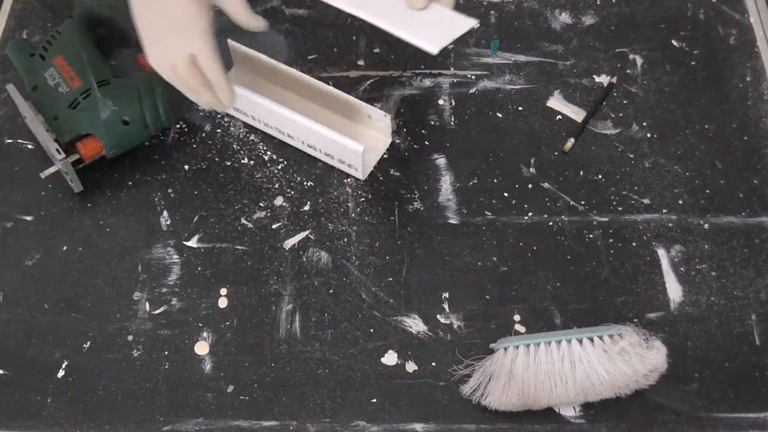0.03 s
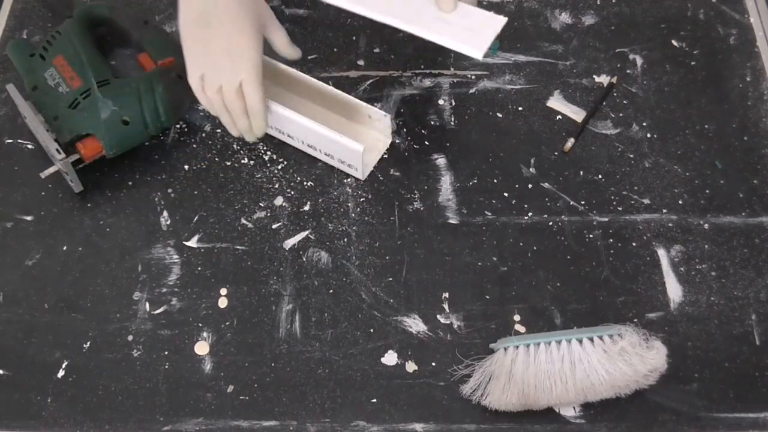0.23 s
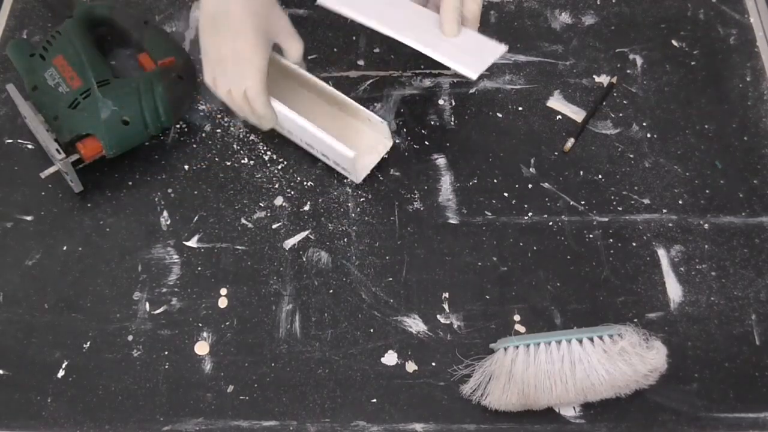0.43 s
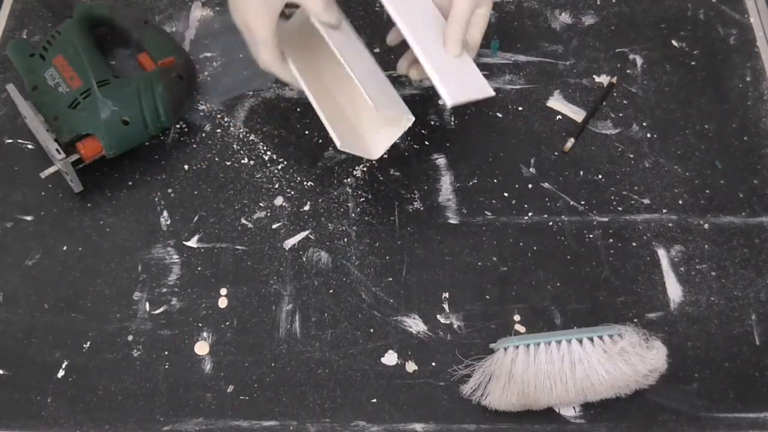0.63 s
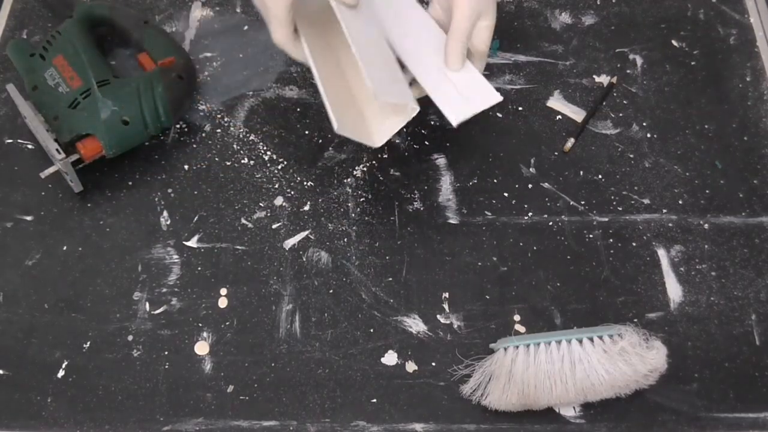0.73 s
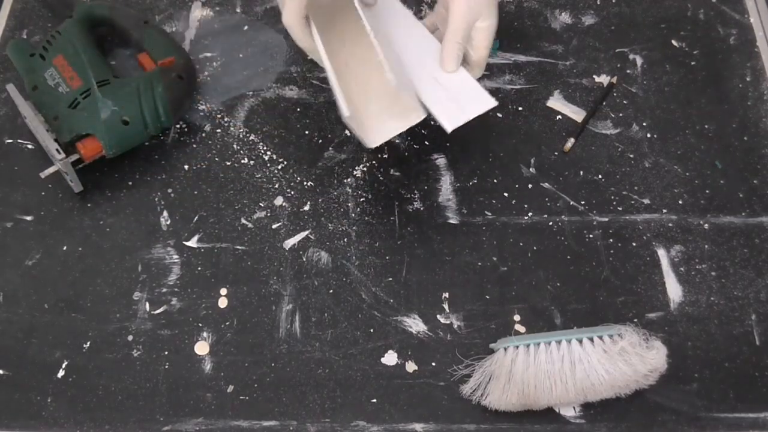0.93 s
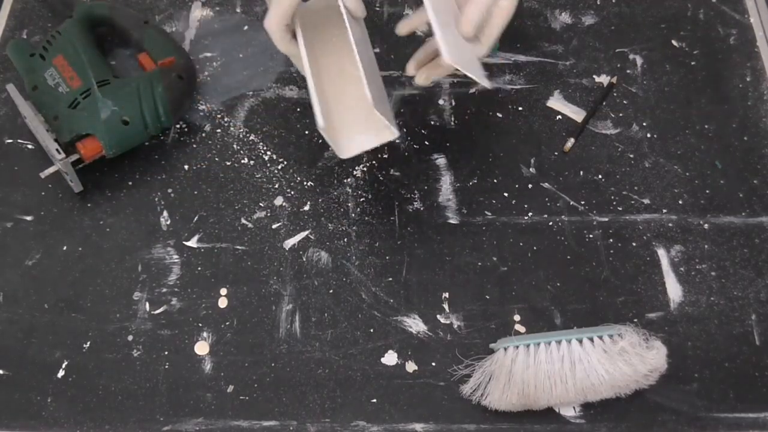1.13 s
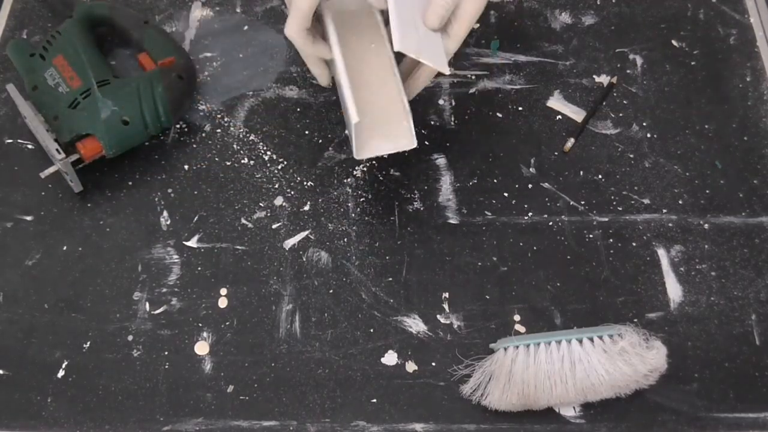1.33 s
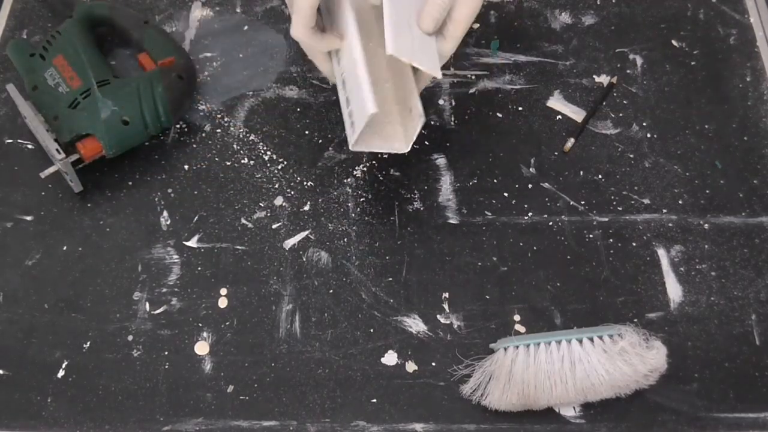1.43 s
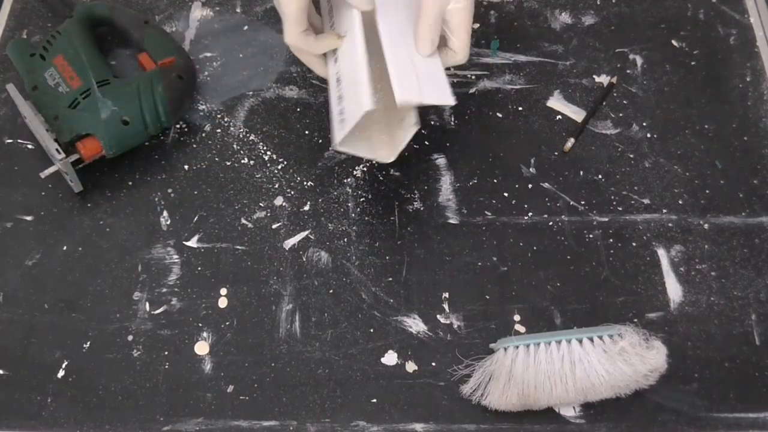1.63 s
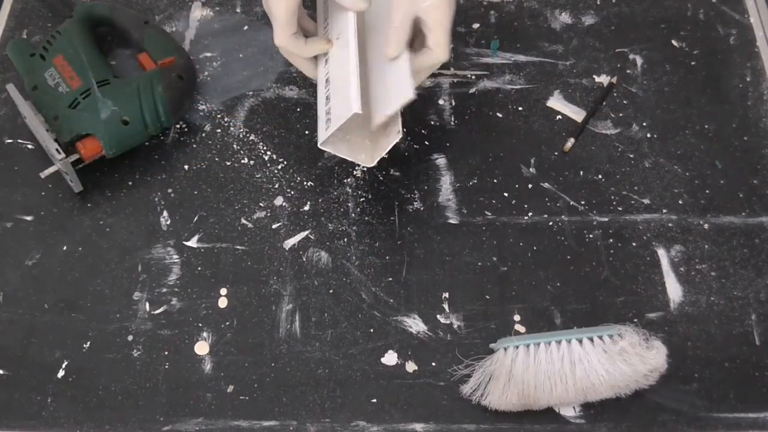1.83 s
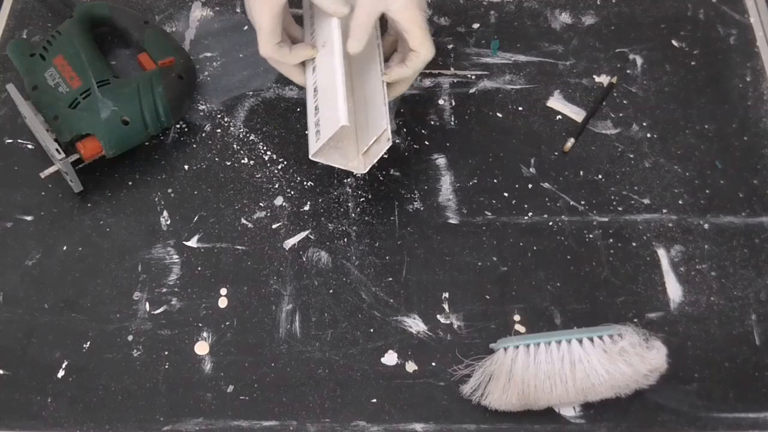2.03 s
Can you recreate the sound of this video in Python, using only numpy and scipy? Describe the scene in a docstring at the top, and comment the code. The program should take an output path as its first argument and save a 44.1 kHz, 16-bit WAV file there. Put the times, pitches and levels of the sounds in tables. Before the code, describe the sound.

Cut plastic duct pieces knock together, hollow, dry and bright. Over steady soft rumble and hiss, a faint scuff off the board at 0.45 s and tiny ticks until 1.0; a clear clack at 1.06; weak taps around 1.45 and 1.6; a sharp clack at 1.75 with gritty edge sliding; then strong clacks at 1.97 and 2.04, the last lower-pitched. Short, lively workshop reverberation, slightly left.

```python
"""Two cut pieces of plastic duct, a trough and its flat lid strip, knock, tap and slide over a wooden board.
Place: a hard workshop. As the strip is fitted on, blows ring the trough's air, its walls and the strip as
damped notes; the air note shifts from blow to blow and is low in the last ones. Edges meet in noise ticks
and slide in random catches. The trough scuffs off the board early on, in swells of coloured noise.
Near surfaces and a stereo room tail answer, over steady filtered-noise hiss and rumble and a faint whine."""
import sys
import numpy as np
from scipy import signal
from scipy.fft import rfft, irfft, next_fast_len
from scipy.io import wavfile
from scipy.ndimage import uniform_filter1d

SR = 44100
rng = np.random.default_rng(int(sys.argv[2]) if len(sys.argv) > 2 else 0)


def ratio(d):
    """dB to gain"""
    e = np.asarray(d, float) / 20
    return 10 ** e


def materialize(psi):
    """Save the field psi as 16-bit PCM at rate SR to the path in sys.argv[1].

    A 1-D psi becomes a single channel; in a 2-D psi each row is a channel.
    """
    bounded = np.clip(np.atleast_2d(psi).T, -1, 1)
    quanta = np.round(bounded * 32767).astype(np.int16)
    wavfile.write(sys.argv[1], SR, quanta)


N = 91816  # samples, about 2.08 s

# Spectrum of the steady rumble and hiss: pitch_hz [Hz], relative_db [dB per Hz]
FLOOR_COLOUR = [(12, -40.5), (20, -22.5), (184, 1.5), (314, 0.5), (342, -1.5), (393, 3.5), (428, -3.5),
                (551, 1.5), (634, -2.5), (794, -3), (1280, -6.5), (2970, -19.5), (3520, -17.5),
                (4050, -15.5), (11500, -19.5), (15200, -22), (16500, -36)]
# Left-right likeness of the steady noise: pitch_hz [Hz], likeness [0 to 1]
FLOOR_LIKENESS = [(60, 0), (180, 0.12), (550, 0.061), (1650, 0), (4970, 0.41), (15000, 0.36)]
# Faint fuzzy whine: pitch_hz [Hz], level_db [dB]
WHINES = [(11000, -77.5)]
# Scuffs, rustles and bumps: peak_s [s], level_db [dB], rise_s [s], t60_s [s], brightness [dB per octave]
SCUFFS = [(0.043, -54.5, 0.007, 0.12, 5), (0.162, -58, 0.032, 0.17, 0.5), (0.198, -60, 0.022, 0.12, 8),
          (0.443, -40.5, 0.0067, 0.19, 2), (0.464, -50, 0.0059, 0.55, -3.5), (1.37, -57.5, 0.09, .15, 4.5),
          (1.60, -55, .006, 0.73, 0), (1.753, -25.5, 0.00083, 0.02, 4), (2.04, -25.5, 0.0043, .04, 3)]
# Colour of noise from board and hands: pitch_hz [Hz], relative_db [dB per Hz]
BOARD_COLOUR = [(24, -57), (40, -18), (130, 0), (180, -6.5), (243, -3), (329, -6), (363, -12), (503, -4.5),
                (542, -5.5), (965, -6), (2570, -28.5), (7730, -35), (16000, -45)]
# Sharp edge ticks, alone or at the front of a knock, before the common lag and trim below:
# start_s [s], level_db [dB], brightness [dB per octave]
TICKS = [(0.292, -36.5, -2.5), (0.7385, -46.5, 10), (0.842, -37, -2), (0.9844, -43.5, 4), (1.061, -16, -1),
         (1.6045, -39, 24), (1.684, -45, 8), (1.699, -39, -2), (1.709, -35.5, 4), (1.743, -23.5, -6.5),
         (1.7525, -14, -17), (1.7634, -23.5, -3), (1.7762, -26.5, 19), (1.9754, -12.5, 18.5),
         (2.013, -24, -6), (2.0274, -34, 3), (2.0363, -9, -1)]
# Colour of an edge tick: pitch_hz [Hz], relative_db [dB]
TICK_COLOUR = [(800, -1), (2500, 3), (3600, -4.5), (9000, 1), (14000, -12), (16500, -39.5)]
# Knocks: start_s [s], hollow_db [dB], hollow_pitch_hz [Hz], walls_db [dB], strip_db [dB]
KNOCKS = [(1.0601, -20, 934, -21, -76), (1.435, -41.5, 817, -75, -74), (1.445, -38, 971, -60, -76),
          (1.452, -40.5, 854, -59, -79), (1.582, -45, 882, -79, -71), (1.598, -42, 885, -69, -78),
          (1.606, -50.5, 897, -46, -52.5), (1.738, -56, 920, -36, -51), (1.7519, -13, 925, -16.5, -19),
          (1.775, -19, 980, -53, -63), (1.845, -24, 980, -52, -57), (1.9746, -25, 1090, -31.5, -19),
          (2.0295, -24, 900, -40, -36), (2.0365, -13, 808, -15.5, -13.5),
          (2.0403, -14.5, 830, -28.5, -19.5), (2.048, -23, 814, -34, -51)]
# Modes of the trough walls: pitch_hz [Hz], width_hz [Hz], level_db [dB]
WALL_MODES = [(690, 40, -5), (1030, 55, 4), (1340, 80, -1), (2360, 150, -10), (3420, 130, -13),
              (3970, 150, -12), (4770, 160, -18), (5390, 300, -17), (6900, 400, -19), (8580, 500, -18),
              (10100, 500, -21)]
# Modes of the lid strip: pitch_hz [Hz], width_hz [Hz], level_db [dB]
STRIP_MODES = [(588, 42, -7.5), (1736, 89, 2), (2330, 127, -3), (2830, 120, -50), (4340, 320, -5.5),
               (4850, 160, -7), (5400, 880, 0), (8200, 1500, -7), (8610, 1500, -39), (10230, 410, -5),
               (14600, 600, -12)]
# Strength of the edges sliding on each other: time_s [s], level_db [dB]
SLIDE_LEVEL = [(1.36, -68), (1.43, -55.5), (1.5, -86), (1.62, -67), (1.69, -60), (1.723, -49), (1.745, -35),
               (1.80, -40), (1.9, -51), (1.96, -44.5), (2.0, -40.5), (2.035, -43.5), (2.08, -41)]
# Decay of the room: pitch_hz [Hz], t60_s [s]
ROOM_DECAY = [(100, 0.29), (500, 0.44), (1000, 0.69), (2500, 0.64), (6000, 0.44), (15000, 0.38)]
# Strength of the room: pitch_hz [Hz], level_db [dB over the direct sound]
ROOM_LEVEL = [(100, -2.5), (500, 2), (1000, -5.5), (2500, -0.5), (6000, -3.5), (15000, -13.5)]
# Echoes of the board and nearest walls: delay_s [s], level_db [dB]
ECHOES = [(.011, -12), (.024, -22), (.0315, -15.5)]

FLOOR_DB, WHINE_WIDTH_HZ = -59, 120
TICK_TRIM_DB, TICK_LAG_S, TICK_T60_S = -5, .0008, .006
HOLLOW_SWELL_S, HOLLOW_START = .0032, .35  # time scale of the swell, share present at once
MODE_SCATTER_DB = 3
CATCHES_PER_S, SLIDE_HOLLOW_HZ = 1900, 980
SLIDE_STRIP_DB, SLIDE_WALLS_DB, SLIDE_HISS_DB = -11.5, -6, -14
ROOM_SIDE_DB, ROOM_DELAY_S = -7, .003
LEFT_OVER_RIGHT_DB = 2
RADIATES_ABOVE_HZ = 426  # small pieces move little air below this
ECHO_TOP_HZ = 1880


def unit(x):
    """Scales a sound to an rms of one."""
    return x / np.sqrt(np.mean(x ** 2) + 1e-20)


def along(points, hz):
    """Reads a table of (Hz, value) points on a log frequency axis."""
    point_hz, value = np.transpose(points)
    return np.interp(np.log(hz + 1), np.log(point_hz + 1), value)


def filtered(x, response):
    """Multiplies the spectrum of x by a response of frequency."""
    size = next_fast_len(x.shape[-1] + 8192)
    spectrum = rfft(x, size) * response(np.fft.rfftfreq(size, 1 / SR))
    return irfft(spectrum, size)[..., :x.shape[-1]]


def add(track, start_s, sound):
    """Mixes a sound in at a time, cut at the end of the track."""
    spot = track[..., round(start_s * SR):][..., :sound.shape[-1]]
    spot += sound[..., :spot.shape[-1]]


def room(x):
    """Stereo tail of decaying noise, new at every call; each frequency dies at its own speed."""
    hz, t, tail = signal.stft(rng.standard_normal((2, SR * 3 // 4)), SR, nperseg=256)
    t60 = along(ROOM_DECAY, hz)[:, None]
    tail = tail * ratio(along(ROOM_LEVEL, hz)[:, None] - 60 * t / t60)
    tail = tail / np.sqrt(t60 * SR / np.log(1e6))  # equal energy whatever the decay
    mid, side = signal.istft(tail, SR, nperseg=256)[1] * ratio([[0], [ROOM_SIDE_DB]])
    wet = signal.fftconvolve(x[None], np.array([mid + side, mid - side]), axes=1)
    return np.pad(wet, ((0, 0), (round(ROOM_DELAY_S * SR), 0)))


def without_bass(x):
    """Small pieces radiate little bass: a fourth-order high-pass."""
    return signal.sosfilt(signal.butter(4, RADIATES_ABOVE_HZ, "high", fs=SR, output="sos"), x)


def placed(track, start_s, sound, to_room=None):
    """Adds a sound a little left, its dull early echoes, and the room's answer to it or to to_room."""
    direct = without_bass(sound)
    add(track, start_s, direct * ratio([[LEFT_OVER_RIGHT_DB / 2], [-LEFT_OVER_RIGHT_DB / 2]]))
    dull = filtered(direct, lambda hz: 1 / (1 + 1j * hz / ECHO_TOP_HZ) ** 2)
    for delay_s, level_db in ECHOES:
        add(track, start_s + delay_s, ratio(level_db) * dull[None])
    add(track, start_s, room(direct if to_room is None else without_bass(to_room)))


def room_tone():
    """Steady rumble and hiss with slight patches, and a faint high whine of narrow noise."""
    cells = signal.stft(rng.standard_normal((2, N + 512)), nperseg=512)[2]
    patches = uniform_filter1d(rng.standard_normal(cells.shape[1:]), size=8, axis=0)
    patches = uniform_filter1d(patches, size=10, axis=1)
    patch_db = 0.27
    pair = signal.istft(cells * ratio(patch_db * unit(patches)), nperseg=512)[1][:, :N]

    def mid_side_colour(hz):
        # this angle shares power between mid and side to give the likeness
        angle = np.arccos(np.clip(along(FLOOR_LIKENESS, hz), -1, 1)) / 2
        return ratio(along(FLOOR_COLOUR, hz)) * np.array([np.cos(angle), np.sin(angle)])

    mid, side = filtered(pair, mid_side_colour)
    whine = np.zeros(N)
    for pitch_hz, level_db in WHINES:
        narrow = filtered(rng.standard_normal(N),
                          lambda hz: 1 / (1 + (2 * (hz - pitch_hz) / WHINE_WIDTH_HZ) ** 2))
        whine += ratio(level_db) * unit(narrow)
    return ratio(FLOOR_DB) * np.array([mid + side, mid - side]) / np.std(mid) + whine


def scuffs():
    """Noise from board and hands that rises to a peak and dies, with the room's answer."""
    out, t = np.zeros(N), np.arange(N) / SR
    for peak_s, level_db, rise_s, t60_s, brightness in SCUFFS:
        rise = np.exp(np.minimum(t - peak_s, 0) / rise_s)
        fall = ratio(-60 * np.maximum(t - peak_s, 0) / t60_s)

        def colour(hz):
            return ratio(along(BOARD_COLOUR, hz) + brightness * np.log2(np.maximum(hz, 140) / 500))

        noise = unit(filtered(rng.standard_normal(N), colour))
        out += ratio(level_db) * rise * fall * noise
    return out + room(out)[:, :N]


def ticks():
    """Hard edges meet: a few milliseconds of bright noise."""
    out, t = np.zeros((2, N)), np.arange(SR // 50) / SR
    for start_s, level_db, brightness in TICKS:
        def colour(hz):
            return ratio(along(TICK_COLOUR, hz) + brightness * np.log2(np.maximum(hz, 3600) / 6000))

        noise = unit(filtered(rng.standard_normal(len(t)), colour))
        near = ratio(level_db + TICK_TRIM_DB - 60 * t / TICK_T60_S) * noise
        # averaged over all directions the colour is smooth: the room hears a filtered click
        click = np.zeros(len(t))
        click[64] = 1
        far = filtered(click, colour)
        far = far * np.linalg.norm(near) / np.linalg.norm(far)
        placed(out, start_s + TICK_LAG_S, near, to_room=far)
    return out


def hollow(pitch_hz, t):
    """The air in the trough: one note that swells over about two cycles and dies fast."""
    u = t / HOLLOW_SWELL_S
    return (HOLLOW_START + u) * np.exp(1 - u) * np.sin(2 * np.pi * pitch_hz * t)


def ring(modes, t):
    """Damped modes of alternating sign, their levels scattered anew at every call."""
    out = np.zeros(len(t))
    sign = -1
    for pitch_hz, width_hz, level_db in modes:
        level = ratio(level_db + MODE_SCATTER_DB * rng.standard_normal())
        decay = np.exp(-np.pi * width_hz * t)  # a wider resonance dies faster
        out += sign * level * decay * np.sin(2 * np.pi * pitch_hz * t)
        sign = -sign
    return out


def knocks():
    """Each blow rings the hollow, the trough walls and the strip in its own shares."""
    out, t = np.zeros((2, N)), np.arange(SR // 10) / SR
    for start_s, hollow_db, hollow_pitch_hz, walls_db, strip_db in KNOCKS:
        air = -ratio(hollow_db) * hollow(hollow_pitch_hz, t)
        walls = ratio(walls_db) * ring(WALL_MODES, t)
        strip = ratio(strip_db) * ring(STRIP_MODES, t)
        placed(out, start_s, air + walls + strip)
    return out


def slide():
    """Rough sawn edges catch at random and ring both pieces and the air, with a bright hiss."""
    out, t = np.zeros((2, N)), np.arange(SR // 10) / SR
    catches = unit((rng.random(N) < CATCHES_PER_S / SR) * rng.standard_normal(N))
    level_db = np.interp(np.arange(N) / SR, *np.transpose(SLIDE_LEVEL), left=-200)
    catches = catches * ratio(level_db)
    parts = [(hollow(SLIDE_HOLLOW_HZ, t), 0), (ring(STRIP_MODES, t), SLIDE_STRIP_DB),
             (ring(WALL_MODES, t), SLIDE_WALLS_DB)]
    body = sum(ratio(part_db) * x / np.linalg.norm(x) for x, part_db in parts)
    hiss = filtered(catches, lambda hz: ratio(SLIDE_HISS_DB + along(TICK_COLOUR, hz)))
    placed(out, 0, signal.fftconvolve(catches, body)[:N] + hiss)
    return out


def scene():
    """All sources in the workshop, as a stereo pair."""
    return room_tone() + scuffs() + ticks() + knocks() + slide()


def top_cut(x):
    """Nothing passes above the cut-off."""
    return signal.sosfilt(signal.butter(12, 16650, fs=SR, output="sos"), x)


def record(dry):
    """Takes the finished stereo mix to its recorded form."""
    return top_cut(dry)


dry = scene()
out = record(dry)
materialize(out)
```